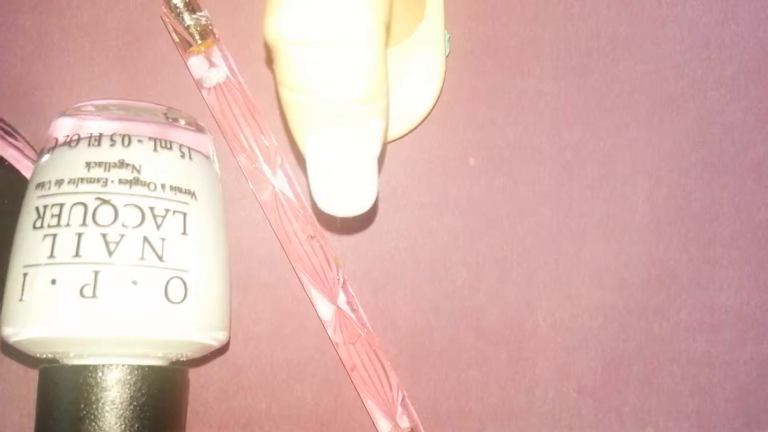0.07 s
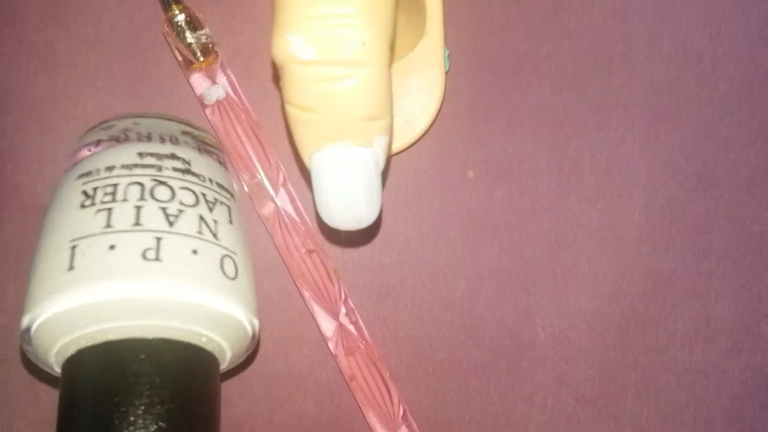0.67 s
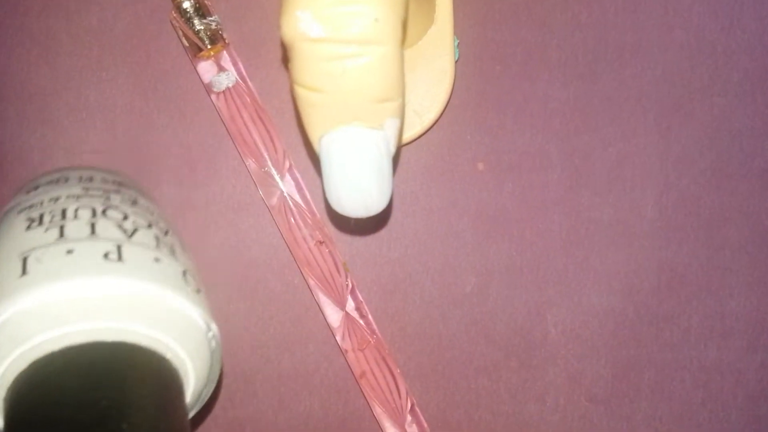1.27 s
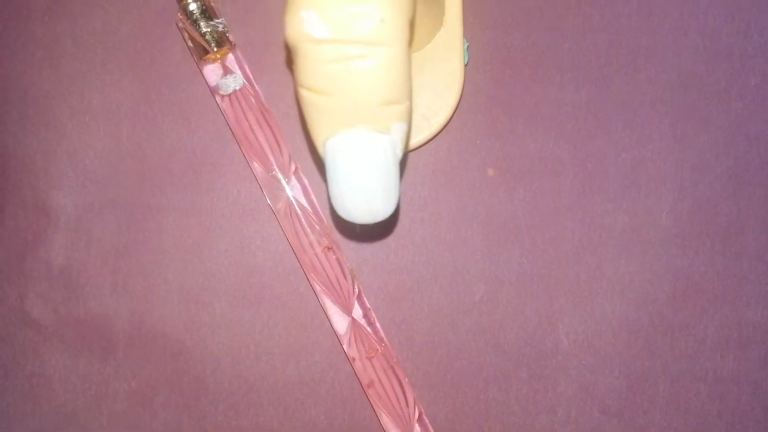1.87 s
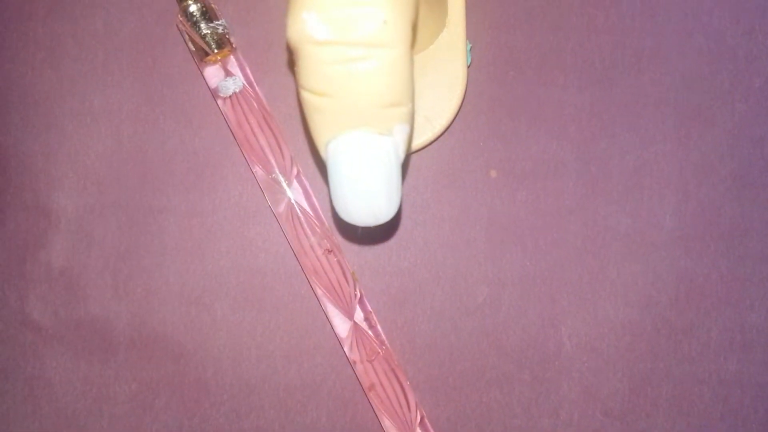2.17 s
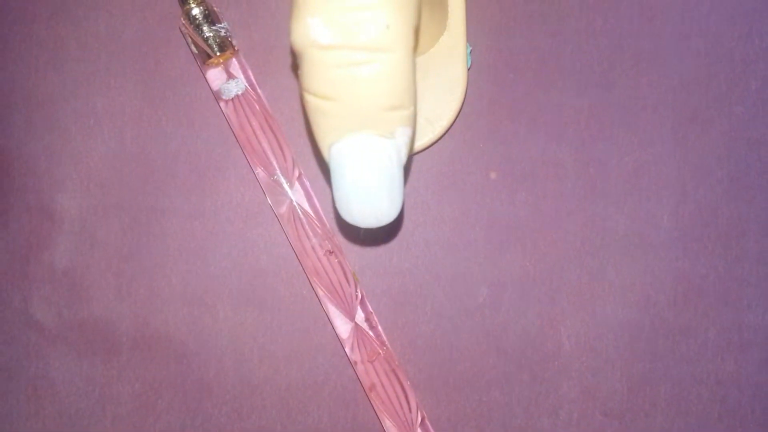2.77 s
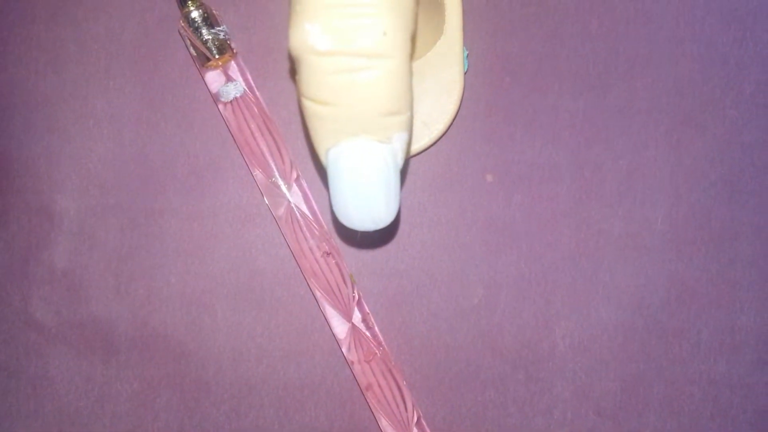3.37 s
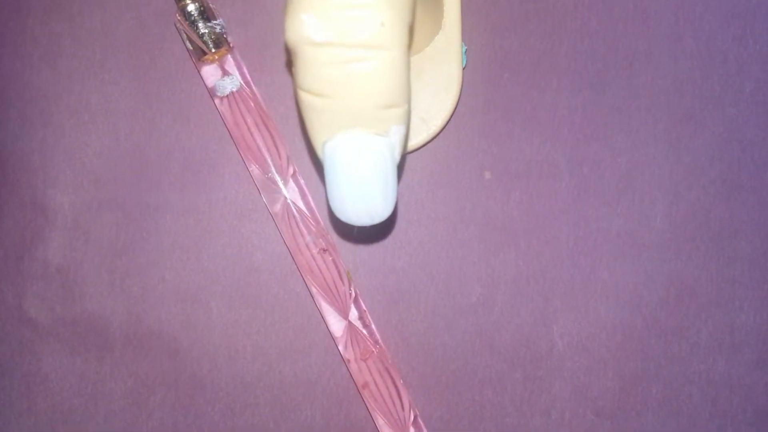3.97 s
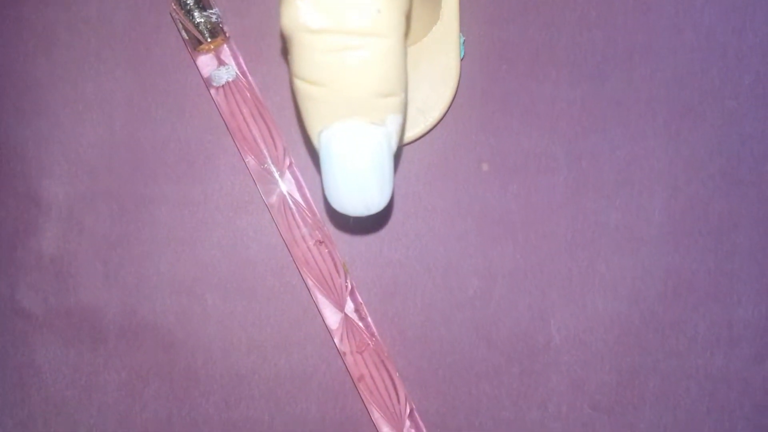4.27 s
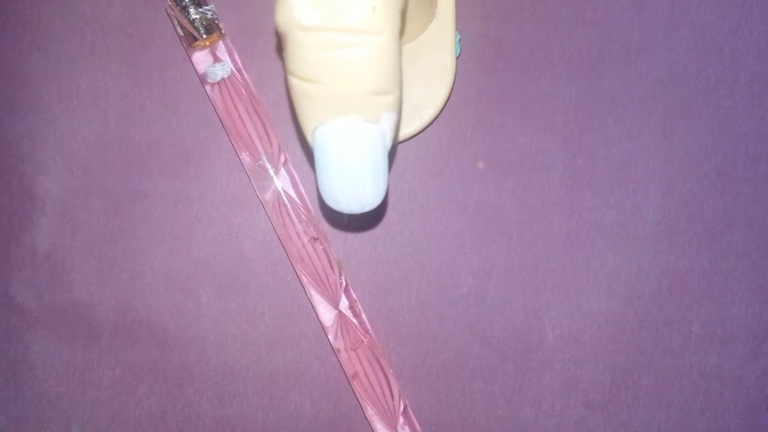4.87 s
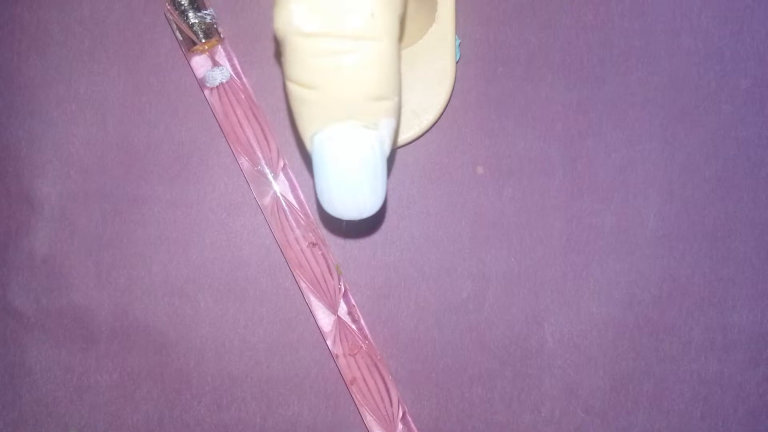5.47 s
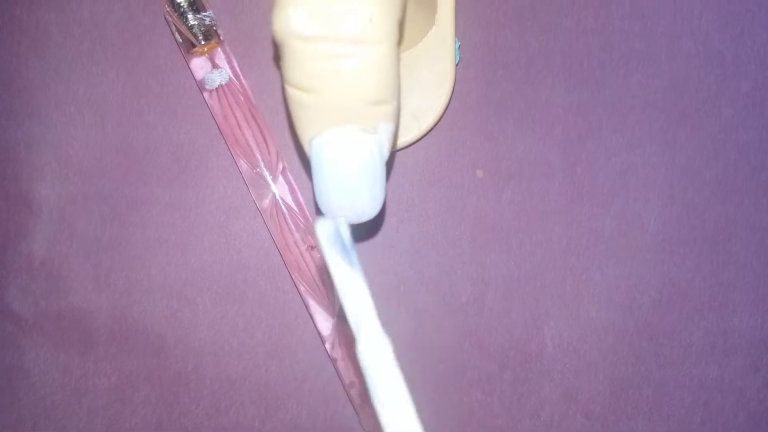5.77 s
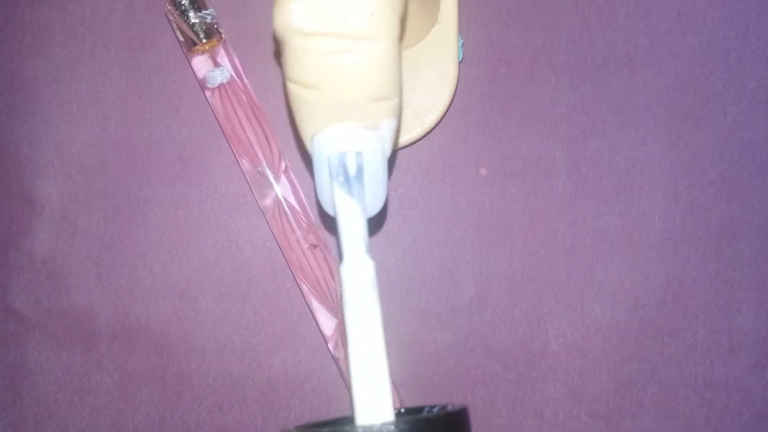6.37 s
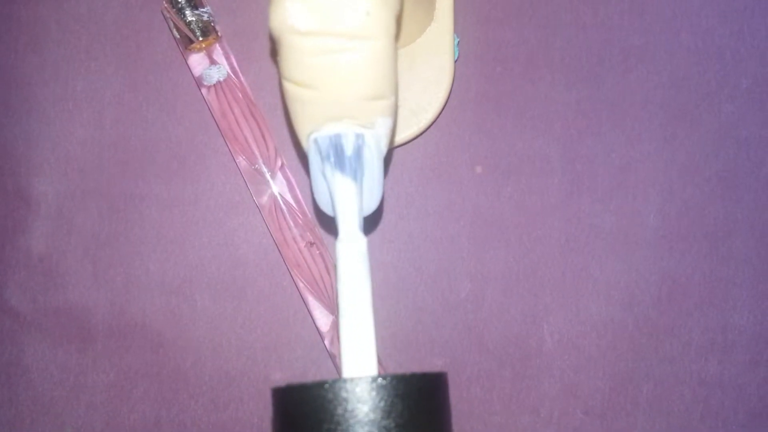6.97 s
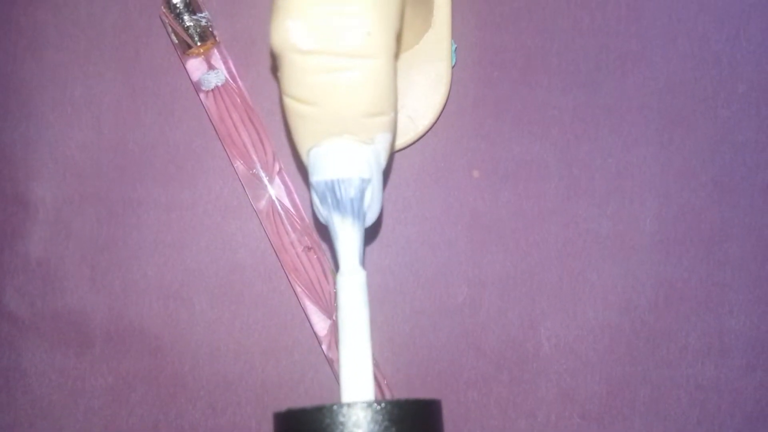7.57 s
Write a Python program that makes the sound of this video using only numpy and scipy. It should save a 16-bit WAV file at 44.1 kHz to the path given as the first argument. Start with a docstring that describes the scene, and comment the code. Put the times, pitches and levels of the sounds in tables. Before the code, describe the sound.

Small irregular clicks, finger rubbing and dull knocks on a table, followed by the high squeaks of a nail polish cap being unscrewed.

```python
"""A glass nail polish bottle is handled close by, over a table in a small room where a motor hums.
Impacts of nail and cap excite the damped modes of the glass, and sliding fingers make friction noise.
The screw cap squeaks by stick-slip as it is twisted open; then the brush works almost silently.
The hand bumps the table, ringing its low modes, and drags over it with a dull rumble."""
import sys
import numpy as np
from scipy import signal
from scipy.fft import rfft, irfft
from scipy.io import wavfile

SR = 44100
rng = np.random.default_rng(int(sys.argv[2]) if len(sys.argv) > 2 else 0)


def store_wav(level_fs):
    """Save 16-bit WAV to argv[1]."""
    pcm = np.round(np.clip(np.atleast_2d(level_fs), -1, 1) * 32767)
    wavfile.write(sys.argv[1], SR, pcm.T.astype(np.int16))


N = 336042
T = np.arange(N) / SR

# contacts of nail, cap and glass: start_s, level_db, favoured_hz, loss_below_db_per_octave, pan_db
TAPS = [(0.611, -18.5, 7150, 8.5, -3.5), (1.373, -43.5, 8500, 15, 0), (1.485, -39, 5200, 4, -4.5),
        (1.499, -42, 7000, 15, -4), (1.899, -37, 5360, 9, -8), (2.163, -48, 8000, -1, -6),
        (2.335, -48, 3200, 4, -3), (2.4786, -43.5, 5230, 14, -1), (2.483, -43, 2300, 4, -3),
                (2.607, -39.5, 3400, 13, -7.5), (2.683, -41, 2580, 8, -5.5), (2.8747, -31.5, 3400, 12.5, 0),
        (3.031, -45, 5830, 24, 7), (3.042, -34.5, 2210, 9, -8), (3.0792, -37.5, 2580, 10, 1),
        (3.1408, -46, 2300, 14, -5), (3.2563, -48, 8000, 14, 6), (3.268, -33.5, 2520, 5.5, -6),
                (3.499, -40.5, 2300, 4.5, -7), (3.5165, -43.5, 2900, 11, -4), (3.6746, -55, 2800, 18, 11),
        (3.706, -47, 2600, 7, -5), (3.8902, -38.5, 2860, 6.5, -8.5), (4.0794, -24.5, 4970, 7.5, -6)]


def glass_taps(chatter_s, first_hit, damping, gain_db, grip_detune=0.025, above_steeper=2.06):
    """Modal impact: a chattering force rings the bottle; contact hardness picks the favoured pitch."""
    # modes of the hand-held bottle and cap, before damping scales them: pitch_hz, level_db, t60_s
    bottle_modes = [(1230, -1, 0.0022), (2000, -3, 0.0066), (2550, -1, 0.0039), (3220, 0.5, 0.0065),
                    (4050, 0, 0.0064), (4660, -2, 0.01), (5580, 3.5, 0.0053), (5750, 6, 0.0089),
                    (6910, 1.5, 0.0022), (8100, -3, 0.00194), (10850, -9, 0.0055), (11000, 0.5, 0.0026),
                    (13400, 1.5, 0.0066)]
    out, t = np.zeros((2, N)), T[:SR // 50]
    for start_s, level_db, favoured_hz, loss_db_per_octave, pan_db in TAPS:
        tap = 0
        for hz, mode_db, t60_s in bottle_modes:
            force = rng.standard_normal((2, len(t))) * np.exp(-t / chatter_s)
            force[:, 0] = first_hit * rng.choice([-1, 1])
            pitch_hz = hz * np.exp(grip_detune * rng.standard_normal())
            width_hz = damping * np.log(1000) / (np.pi * t60_s)
            mode = resonate(resonate(force, pitch_hz, width_hz), pitch_hz, pitch_hz / 2)
            octaves = np.log2(hz / favoured_hz)
            loss_db = loss_db_per_octave * max(-octaves, above_steeper * octaves)
            tap = tap + rms_one(mode) * from_db(mode_db - loss_db)
        attack_rms = np.sqrt(np.mean(tap[:, :SR // 300] ** 2, axis=1, keepdims=True))
        add(out, start_s, tap / attack_rms * pan(pan_db) * from_db(level_db + gain_db))
    return out


def cap_squeak(pitch_hz=2608, waver_hz=17, rough_db=2.5, tone_db=-2.5, grit_db=-19, judder_db=2.0):
    """Self-excited vibration: the cap sings one tone while juddering friction stirs higher modes."""
    # resonances of the turning cap: pitch_hz, width_hz, level_db
    cap_modes = [(2683, 370, -12), (2750, 39, -17.5), (3026, 120, -24), (3340, 22, -23.5),
                 (3360, 440, -16.5), (6470, 57, -16.5), (6410, 600, -15.5), (12240, 210, -25.5),
                 (12200, 68, -26.5), (12350, 830, -22.5)]
    # spectrum of the friction in the neck: frequency_hz, density_db
    grit_spectrum = [(1500, 10.5), (2500, -5), (4000, 13), (5000, 10), (7000, 3.5), (9000, 4), (13000, 8),
                     (15000, -40)]
    sing, scrape = stick_slip()
    phase = 2 * np.pi * np.cumsum(pitch_hz + waver_hz * drift(90)) / SR
    tone = rms_one(np.sin(phase) * from_db(rough_db * drift(46))) * from_db(tone_db)
    friction = from_db(grit_db) * noise(grit_spectrum)
    for hz, width_hz, mode_db in cap_modes:
        mode = resonate(resonate(rng.standard_normal(N), hz, width_hz), hz, width_hz)
        friction += rms_one(mode) * from_db(mode_db)
    judder = rms_one(from_db(judder_db * drift(78)))
    return sing * tone + scrape * friction * judder


def stick_slip(rise_s=0.0018, release_s=0.0073, stick_db=-4, stick_s=0.008, twist_tone_db=-13):
    """Stick-slip envelopes of tone and friction: the twist quietens as the cap sticks, then it slips."""
    # twists of the cap in the neck: start_s, hardest_push_s, end_s, level_db
    twists = [(0.094, 0.113, 0.25, -30.5), (4.325, 4.427, 4.55, -31), (4.671, 4.83, 5.02, -29)]
    # the cap breaks free and squeals: start_s, level_db, length_s
    slips = [(0.114, -32, 0.024), (4.384, -43, 0.011), (4.4042, -24, 0.0055), (4.683, -40.5, .018),
             (4.758, -33, 0.028), (4.816, -18, 0.0046), (4.832, -23.5, 0.028), (4.914, -30.5, 0.0073)]
    twisting = sum(envelope([(start_s, db - 17.5), (push_s, db), (end_s, db - 22.5)])
                   for start_s, push_s, end_s, db in twists)
    sticking = sum(swell(T - start_s + stick_s, stick_s) for start_s, _, _ in slips)
    twisting *= from_db(stick_db * sticking)
    tone_power, friction_power = (twisting * from_db(twist_tone_db)) ** 2, twisting ** 2
    for start_s, level_db, length_s in slips:
        i, t = round(start_s * SR), T[:SR // 5]
        slip = (1 - np.exp(-t / rise_s)) * np.exp(-np.maximum(t - length_s, 0) / release_s)
        friction_db = -31.5 + 0.45 * (level_db + 25.5)  # grows more slowly than the squeal
        tone_power[i:i + len(t)] += (slip * from_db(level_db)) ** 2
        friction_power[i:i + len(t)] += (slip * from_db(friction_db)) ** 2
    return np.sqrt(tone_power), np.sqrt(friction_power)


def rubbing(cap_hz=2500, cap_width_hz=650, cap_db=-3.5, grip_from_s=1.85, grip_to_s=4.1, grip_db=-66.5):
    """Sliding friction: strokes swell and fade as grainy hiss over the faint rustle of the grip."""
    # spectrum of the sliding: frequency_hz, density_db
    rub_spectrum = [(700, -8), (1400, -1.5), (2300, -8.5), (3500, -5.5), (4600, -1.5), (5900, 3.5),
                    (7500, -2.5), (9000, -3), (11000, 0), (13500, -2), (15000, -23)]
    # strokes of the fingers, then of the brush: centre_s, level_db, spread_s, tilt_db_per_octave
    strokes = [(0.167, -48.5, 0.036, -2.5), (0.267, -51, 0.02, -3.5), (0.372, -52, .02, -3.5),
               (0.548, -46.5, 0.023, -3), (1.199, -56, .025, -1.5), (1.582, -53.5, 0.021, -2.5),
               (1.864, -50.5, .011, -0.5), (1.907, -44.5, 0.012, -1.5), (2.008, -53.5, 0.011, 2),
               (2.082, -50.5, 0.032, -1.5), (2.383, -47, 0.016, -2), (2.839, -50, 0.0095, -3),
               (2.919, -44, 0.01, -2.5), (3.097, -48.5, 0.046, -5), (3.342, -49.5, 0.026, -6),
               (3.553, -51.5, 0.022, -5.5), (5.404, -63.5, 0.15, -3.5), (5.735, -59.5, .011, 4),
               (7.208, -63, .017, -2), (7.4, -63, .021, 1)]
    grip = (T > grip_from_s) * (T < grip_to_s) * from_db(grip_db + drift(9))
    out, t = grip * noise(rub_spectrum), T[:SR // 3] - 0.16
    for centre_s, level_db, spread_s, tilt in strokes + finger_slides():
        hiss = noise(rub_spectrum, tilt, size=len(t))
        # the duller strokes run over the hollow cap and make it resonate
        hiss += max(-tilt, 0) * from_db(cap_db) * resonate(hiss, cap_hz, cap_width_hz)
        add(out, max(centre_s + t[0], 0), from_db(level_db) * swell(t, spread_s) * rms_one(hiss))
    return out * skin_grain()


def finger_slides(loudest_db=-51, under_tap_db=4, lag_s=0.006, spread_s=0.018, double_tap_s=0.035):
    """Glancing contact: each tap or quick double tap adds a stroke, brighter for a harder contact."""
    strokes, last_s = [], 0
    for start_s, level_db, favoured_hz, _, _ in TAPS:
        if start_s - last_s > double_tap_s:
            tilt = -3.5 + 1.2 * np.log2(favoured_hz / 4000)
            strokes.append((start_s + lag_s, min(loudest_db, level_db - under_tap_db), spread_s, tilt))
        last_s = start_s
    return strokes


def skin_grain(grain_db=1.0, catches_per_s=110, catch_db=5, catch_s=0.0005):
    """Amplitude modulation: skin catches and lets go, giving a restless gain with spikes of crackle."""
    catches = (rng.random(N) < catches_per_s / SR) * np.minimum(rng.exponential(1, N), 2)
    spikes = signal.lfilter([1], [1, -np.exp(-1 / (catch_s * SR))], catches + 1e-18)
    return rms_one(from_db(grain_db * drift(740)) + from_db(catch_db) * spikes)


def table_bumps(gain_db=1, softness=0.7, contact_s=0.00068, detune=0.069):
    """Damped free vibration: the table thuds, and gentler bumps excite its upper modes less."""
    # soft contacts of the hand: start_s, level_db
    bumps = [(0.542, -30), (0.585, -29), (0.613, -32), (0.749, -31.5), (1.477, -20.5), (1.585, -29.5)]
    # modes of the table top: pitch_hz, level_db, t60_s
    table_modes = [(207, -7, 0.046), (265.3, -1, 0.074), (361.5, -5, 0.077), (474, 1, 0.039),
                   (626, 2, 0.028), (806, -9, 0.042)]
    out, t = np.zeros((2, N)), T[:SR // 5]
    hardest_db, lowest_hz = max(db for _, db in bumps), table_modes[0][0]
    for start_s, level_db in bumps:
        thud = 0
        for hz, mode_db, t60_s in table_modes:
            dull_db = softness * (level_db - hardest_db) * np.log2(hz / lowest_hz)
            phase = 2 * np.pi * (hz * (1 + rng.normal(0, detune)) * t + rng.random())
            thud = thud + from_db(mode_db + dull_db - 60 * t / t60_s) * np.sin(phase)
        thud *= 1 - np.exp(-t / contact_s)
        add(out, start_s, thud / np.abs(thud).max() * from_db(level_db + gain_db))
    return out


def hand_drags(gain_db=-1):
    """Friction noise: each drag of the hand on the table is a swell of dull rumble."""
    # drags on the table: centre_s, level_db, spread_s
    drags = [(0.469, -39, 0.023), (0.571, -35, 0.04), (0.76, -41.5, 0.033), (0.9, -48, 0.035),
             (1.494, -37.5, 0.023), (1.666, -46.5, 0.052), (3.207, -51, 0.15), (4.776, -47.5, 0.18)]
    # spectrum of the dragging: frequency_hz, density_db
    drag_spectrum = [(100, -28), (170, 2), (260, 7), (350, 5), (480, -7), (670, -3.5), (1000, -15.5),
                     (2000, -23), (6000, -36)]
    pressure = sum(from_db(db) * swell(T - centre_s, spread_s) for centre_s, db, spread_s in drags)
    return from_db(gain_db) * pressure * noise(drag_spectrum)


def room(x, t60_s=0.25, gain_db=-7.5, absorb_above_hz=11000, build_s=0.0049):
    """Diffuse reverberation: a short tail, different at each port and dulled by the furnishings."""
    t = T[:SR // 2]
    tail = rng.standard_normal((2, len(t))) * from_db(-60 * t / t60_s) * (1 - np.exp(-t / build_s)) ** 2
    tail /= np.sqrt(np.sum(tail ** 2) / 2)
    tail = signal.sosfilt(signal.butter(1, absorb_above_hz, fs=SR, output="sos"), tail)
    return from_db(gain_db) * signal.fftconvolve(x, tail, axes=1)[:, :N]


def ports(x):
    """Level difference: the left microphone port favours the low treble, the right one the top."""
    # response to nearby sources: frequency_hz, left_minus_right_db
    balance = [(300, -2), (1800, 3), (2700, 6.5), (3500, 10), (5000, 9), (6400, 16), (7400, 0.5), (8500, 2),
               (10000, -6), (12000, -8.5), (14000, -9)]
    hz = np.maximum(np.fft.rfftfreq(N, 1 / SR), 1)
    gains = from_db(np.array([[1], [-1]]) * at_hz(balance, hz) / 2)
    return irfft(rfft(x) * gains / np.sqrt(np.mean(gains ** 2, axis=0)), N)


def air_and_hum(air_db=-46.5, flutter_db=1.27, waver_db=3.5, wander=0.00613, left_lag_s=0.00011):
    """Line spectrum over broadband noise: motor hum and room air reach the right port first."""
    # spectrum of the room air: frequency_hz, density_db
    air_spectrum = [(20, -29), (34, -32), (46, -25), (70, -19), (110, -12.5), (190, -9.5), (250, -3.5),
                    (320, -8.5), (450, -14), (800, -19), (1150, -24.5), (1450, -26), (1800, -31.5),
                    (2700, -36.5), (4000, -41), (6000, -41.5), (8000, -44), (14500, -47)]
    # partials of the motor: pitch_hz, rms_db
    hum_lines = [(48.2, -62.5), (96.8, -56), (145.5, -59.5), (175.4, -61), (190, -59.5), (228.5, -53),
                 (274, -61), (447, -61.5), (776, -67.5)]
    out = from_db(air_db + flutter_db * drift(20.3)) * noise(air_spectrum)
    for hz, rms_db in hum_lines:
        phase = 2 * np.pi * (np.cumsum(hz * (1 + wander * drift(4.39))) / SR + rng.random())
        out += from_db(rms_db) * rms_one(np.sin(phase) * from_db(waver_db * drift(3.5)))
    return np.array([np.roll(out[0], round(left_lag_s * SR)), out[1]])


def noise(spectrum, tilt_db_per_octave=0, size=N):
    """Partial coherence: coloured stereo noise of rms 1, alike at both ports in the bass."""
    # likeness of left and right: frequency_hz, coherence
    likeness = [(60, 0.69), (200, 0.95), (400, 0.83), (800, 0.15), (1600, 0.23), (14000, 0)]
    hz = np.maximum(np.fft.rfftfreq(size, 1 / SR), 1)
    mid, side = rfft(rng.standard_normal((2, size)))
    coherence = at_hz(likeness, hz)
    stereo = mid + np.sqrt((1 - coherence) / (1 + coherence)) * side * [[1], [-1]]
    colour_db = at_hz(spectrum, hz) + tilt_db_per_octave * np.log2(np.maximum(hz, spectrum[0][0]))
    return rms_one(irfft(stereo * from_db(colour_db), size))


def drift(rate_hz):
    """Random fluctuation: low-passed noise of rms 1, computed at every 20th sample."""
    r = np.exp(-40 * np.pi * rate_hz / SR)
    slow = signal.lfilter([1], [1, -2 * r, r * r], rng.standard_normal(N // 20 + 4002))[4000:]
    return np.interp(np.arange(N) / 20, np.arange(len(slow)), rms_one(slow))


def resonate(x, hz, width_hz):
    """Two-pole resonance with a peak gain of 1."""
    r = np.exp(-np.pi * width_hz / SR)
    feedback = [1, -2 * r * np.cos(2 * np.pi * hz / SR), r * r]
    return signal.lfilter(np.array([1, 0, -1]) * (1 - r * r) / 2, feedback, x)


def swell(t, spread_s):
    """Gaussian rise and fall around t = 0."""
    return np.exp(-np.minimum((t / spread_s) ** 2, 60) / 2)


def envelope(rows):
    """Gain interpolated from rows of time_s, level_db; silent outside them."""
    time_s, level_db = np.transpose(rows)
    return from_db(np.interp(T, time_s, level_db, left=-120, right=-120))


def at_hz(points, hz):
    """Interpolate a spectrum on a log-frequency axis."""
    frequency_hz, value = np.transpose(points)
    return np.interp(np.log(hz), np.log(frequency_hz), value)


def pan(left_minus_right_db):
    """Constant-power gains for left and right."""
    return rms_one(from_db([[left_minus_right_db / 2], [-left_minus_right_db / 2]]))


def add(out, start_s, sound):
    """Superpose a short sound on the mix."""
    i = round(start_s * SR)
    out[:, i:i + sound.shape[-1]] += sound[..., :N - i]


def from_db(db):
    """Decibels to amplitude ratio."""
    return 10 ** (np.asarray(db) / 20)


def rms_one(x):
    """Normalise to rms 1."""
    return x / np.sqrt(np.mean(x ** 2) + 1e-20)


def scene(table_low_hz=160, scatter_edge=0.15):
    """Superposition of the direct sound of bottle and hands, its reverberation and the room's hum."""
    # the thuds and drags carry little below the table's first mode
    low_cut = signal.butter(2, table_low_hz, "high", fs=SR, output="sos")
    thuds = signal.sosfilt(low_cut, table_bumps() + hand_drags())
    handling = thuds + cap_squeak() + rubbing()
    direct = glass_taps(chatter_s=0.0019, first_hit=3.7, damping=0.81, gain_db=3.0)
    # the walls get each click from all directions, which evens out and brightens its colour
    scattered = glass_taps(chatter_s=0.0001, first_hit=5.0, damping=5.0, gain_db=-1.5)
    scattered = signal.lfilter([1, -scatter_edge], [1], scattered)
    return ports(direct + handling + room(scattered + handling)) + air_and_hum()


def record(dry, start_s=0.115, cutoff_hz=14800):
    """Gating and band limiting: the sound opens after a brief silence, its top cut steeply."""
    low_pass = signal.ellip(10, 0.1, 80, cutoff_hz, fs=SR, output="sos")
    return signal.sosfilt(low_pass, dry * (T >= start_s))


dry = scene()
out = record(dry)
store_wav(out)
```